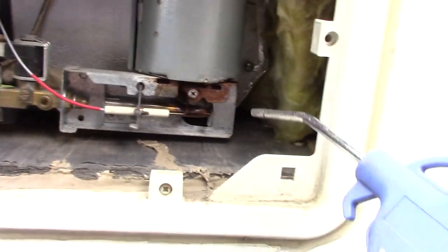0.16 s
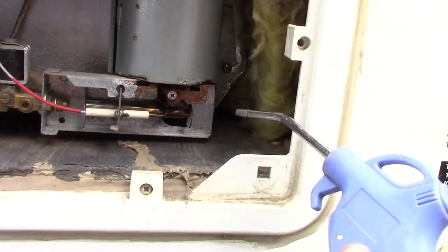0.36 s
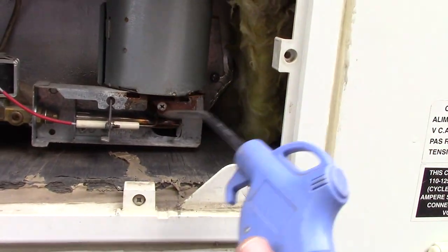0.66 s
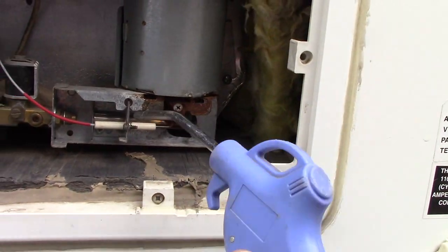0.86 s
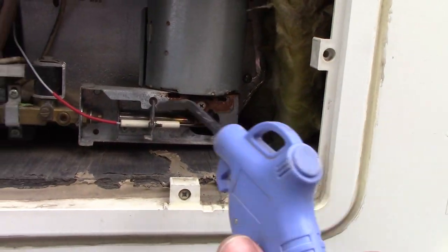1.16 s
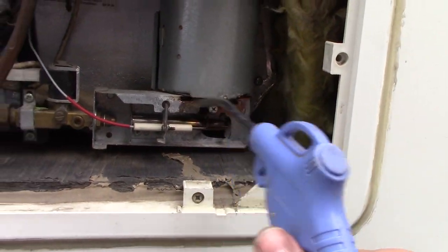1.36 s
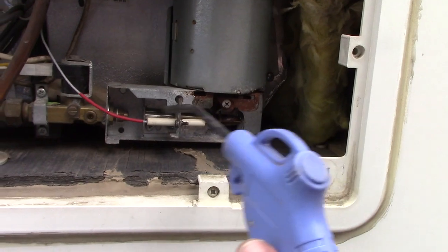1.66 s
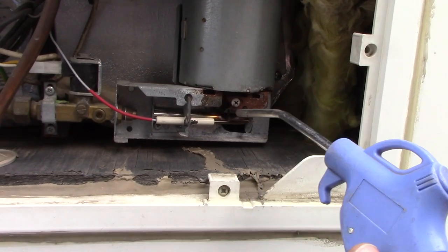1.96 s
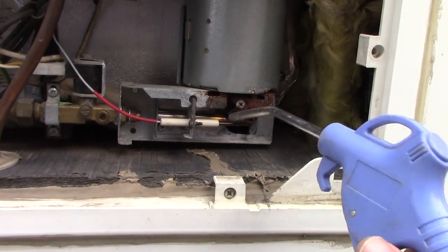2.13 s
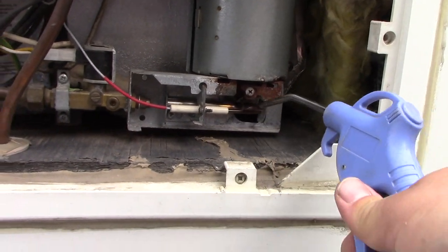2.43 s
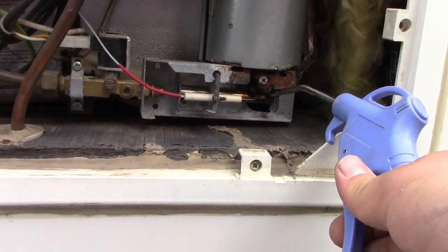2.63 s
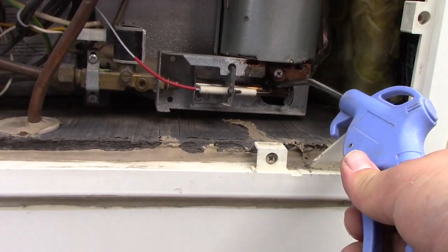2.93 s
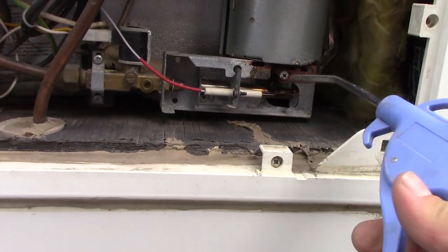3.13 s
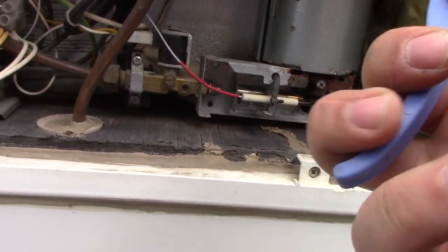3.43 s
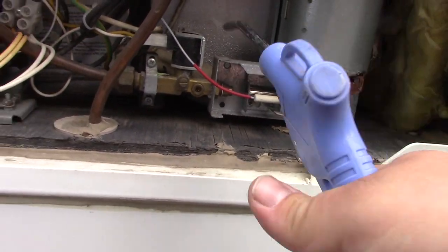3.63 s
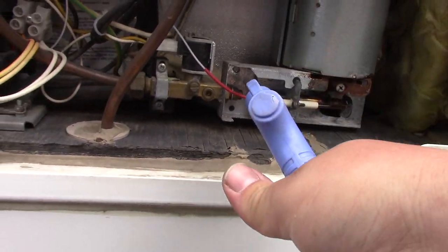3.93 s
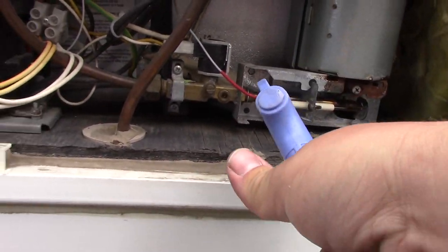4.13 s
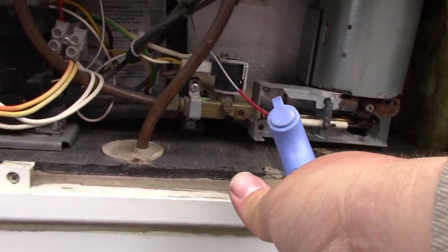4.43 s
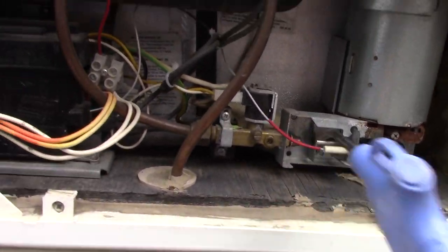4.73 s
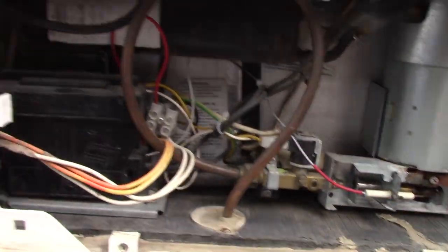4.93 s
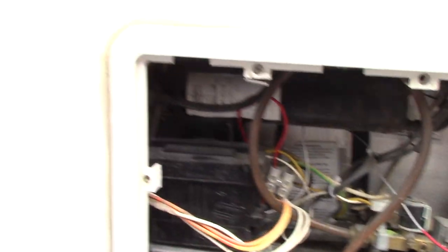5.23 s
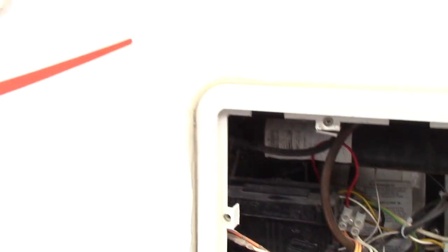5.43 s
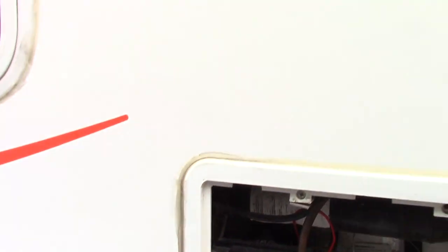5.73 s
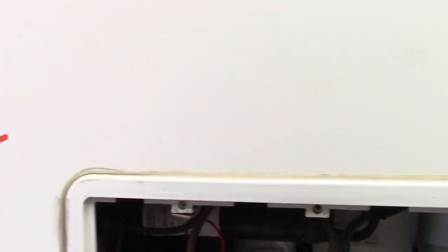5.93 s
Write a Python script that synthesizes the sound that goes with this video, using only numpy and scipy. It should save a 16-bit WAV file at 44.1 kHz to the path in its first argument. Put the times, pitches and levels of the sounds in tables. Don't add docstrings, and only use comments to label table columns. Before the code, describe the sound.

Close compressed-air jet roars and hisses over steel for two seconds, then a slot burst, a whistling tube blast and quick puffs over faint traffic.

```python
import sys
import numpy as np
from scipy import signal
from scipy.fft import rfft, irfft, next_fast_len
from scipy.io import wavfile
from scipy.ndimage import uniform_filter1d, map_coordinates

SR = 44100
rng = np.random.default_rng(int(sys.argv[2]) if len(sys.argv) > 2 else 0)


def gain_from_decibels(decibels):
    exponent = np.asarray(decibels, float) / 20
    return 10 ** exponent


def store_wav(level_fs):
    pcm = np.round(np.clip(np.atleast_2d(level_fs), -1, 1) * 32767)
    wavfile.write(sys.argv[1], SR, pcm.T.astype(np.int16))


N = 268569
HZ = np.fft.rfftfreq(N, 1 / SR) + 1
T = np.arange(N) / SR

# low edge in Hz, high edge in Hz.
LAYER_BANDS_HZ = (6000, 12000), (1500, 6000), (0, 1500), (12000, 22050)
# frequency in Hz, level in dB per Hz.
ON_BRACKET = [(18, -74), (30, -43.5), (93, -36.5), (271, -11), (423, -7.5), (733, -4), (1170, -6),
              (2400, 1), (3300, 2), (4400, 0), (5650, -2), (6280, -1), (7160, 4), (10300, 2.5),
              (12700, -9.5), (14500, -15), (15700, -14.5)]
IN_SLOT = [(18, -76.5), (30, -51), (371, -18.5), (469, -13.5), (535, -16), (977, -9.5), (1060, -8.5),
           (1300, -8.5), (1450, -8), (4350, 1.5), (5960, -4), (10600, -3.5), (15700, -16)]
IN_TUBE = [(18, -67), (30, -36), (183, -43), (293, -28.5), (508, -35), (610, -17.5), (677, -25.5),
           (1090, -21), (1880, -3.5), (2940, -0.5), (6110, -7), (7740, 0), (10100, -3.5), (13100, -7),
           (15700, -8.5)]
FREE_AIR = [(18, -66), (30, -37.5), (193, -31), (952, -14.5), (1060, -16), (1490, -13), (4580, -5.5),
            (7740, 6), (9800, 2), (11800, -2), (15700, -11)]
AIM_ENDS_S = 2.5, 3.5, 4.88, 5.18, 5.34, 5.5
# frequency in Hz, width in Hz, lift in dB.
TUBE_MODES = [(595, 53, 3), (1990, 240, 2), (2960, 380, 3.5), (3740, 130, 6.5), (4640, 490, 3.5),
              (7680, 620, 3.5), (10030, 450, 7), (11900, 400, 3.5)]
# frequency in Hz, width in Hz, lift in dB.
FRAME_MODES = [(2730, 1530, 4.5), (6280, 1400, 1), (7760, 500, 2), (10200, 200, 0), (12280, 1100, 3),
               (13300, 700, 1.5)]
# frequency in Hz, width in Hz, lift in dB.
MIC_NOTCH = [(12800, 900, -4)]
# lag in ms, drift with the hand in ms, level in dB.
WALLS = [
    (.55, 0.094, -13.5),
    (1.901, .2, -23.5),
    (5.501, .4, -23.5),
]

# time in seconds, hiss in dB, contact with metal in dB.
FLOW_LONG = [(0, -14.5, -1.5), (.07, -19, 0.1), (.16, -19.5, -1.5), (.45, -19.5, -1), (.6, -20.5, 4.5),
             (1.0, -20, -0.1), (1.5, -20.5, 2), (1.995, -22.5, 3), (2.035, -28.5, -0.5)]
FLOW_MIDDLE = [
    [(2.74, -23, -4), (2.76, -16, -0.5), (2.815, -15, 1.5), (2.87, -16.5, 1.3), (2.908, -21, 2),
     (2.998, -21, 1.5), (3.038, -29, -3.5)],
    [(4.06, -28, -1.5), (4.075, -21.5, -3.5), (4.152, -21.5, 3), (4.172, -14.5, 0), (4.19, -11.5, 2),
     (4.296, -19, 3.5), (4.624, -21, 3.5), (4.682, -21, -6.5)],
]
FLOW_PUFFS = [
    [(4.96, -18.5, 2), (4.974, -13.5, -1), (5.02, -13.5, -5), (5.054, -15.5, -5), (5.108, -28, 7)],
    [(5.2, -17.5, -12), (5.225, -18, 1), (5.27, -19.5, 4), (5.3, -23.5, 1)],
    [(5.373, -18.5, -0.5), (5.42, -18.5, 1.4), (5.447, -18.5, -0.3), (5.466, -21.5, -0.5)],
    [(5.528, -20, -2.5), (5.55, -20, 6), (5.58, -22, -3), (5.606, -21.5, -3.5), (5.626, -26, -8.5)],
]
# time in seconds, hiss in dB.
SEEP = [(5.3, -47), (5.36, -37.5), (5.5, -43.5), (5.64, -37.5), (5.67, -34.5), (5.72, -44), (5.77, -45.5),
        (5.83, -46.5), (5.88, -56.5), (5.95, -67), (6.09, -76)]
# fully open in seconds, rise in dB per second.
OPENS = [
    (0, 2000),
    (2.738, 1601),
    (4.056, 3500),
    (4.958, 3000),
    (5.197, 3500),
    (5.37, 2199),
    (5.526, 1600),
]
# start in seconds, fall in dB per second, echo left in the yard in dB.
SHUTS = [
    (2.037, 2202, -53.5),
    (3.04, 1800, -54.5),
    (4.682, 2187, -46),
    (5.111, 1506, -43),
    (5.301, 1500, -39),
    (5.467, 1000, -36),
    (5.628, 1400, -50),
]
# fully open in seconds, leak in dB, rise in dB per second.
LEAKS = [
    (2.736, -38.5, 1000),
    (4.054, -41.5, 699),
    (4.957, -21, 1500.5),
    (5.197, -41, 1499),
]
# time in seconds, length in seconds, change in dB.
SWEEPS = [(.56, 0.025, -0.5), (.67, 0.011, -2.5), (1.03, 0.013, -0.5), (1.15, 0.0068, -1),
          (1.29, 0.054, -3), (1.346, 0.0099, 3), (1.42, 0.046, -3), (1.48, .03, 1), (1.9, 0.02, 0),
          (1.95, 0.029, 2)]
# time in seconds, length
# in seconds, change in dB.
SLIPS = [(1.216, .006, -18), (1.282, 0.0051, -5), (1.508, 0.0073, -15), (1.804, 0.009, -8.5),
         (1.894, 0.009, -8), (1.96, .07, -4), (2.024, .022, -13), (2.898, .008, 11)]
# splash, roar and edge, all in dB against the hiss.
LAYERS_DB = [
    (-3, -11, -6),
    (-1.5, -19, -4.5),
    (-2.1, -22.5, -8),
    (-4.5, -23.5, -2),
    (-6, -20, -0.5),
    (-4.5, -22, -2),
    (-5.5, -22.5, 0.5),
]
CONTACT_SHARE = .3, 0.79, .1
# time in seconds, length in seconds, frequency in Hz, lift in dB.
GLINTS = [(0.093, 0.054, 11200.0, 4.1), (0.146, 0.054, 8440.0, -4.0), (0.363, 0.082, 14500, 3.8),
          (0.438, 0.139, 12500, -1), (0.48, 0.049, 8700.0, 2.5), (0.7, 0.015, 7640, 4.5),
          (0.723, 0.045, 13950.0, 6), (0.882, 0.023, 5250.0, -3.4), (1, 0.028, 4420, 5.5),
          (1.207, 0.093, 11020.0, -3), (1.353, 0.035, 14730.0, -3.5), (1.373, 0.028, 12500, 6.5),
          (1.395, 0.041, 8530.0, -6), (1.75, 0.038, 12750.0, 5.5), (1.872, 0.054, 12920.0, 4),
          (1.884, 0.035, 4480.0, -5), (1.892, 0.035, 11000, 4.5), (1.895, 0.041, 2840.0, -4.5),
          (1.95, 0.036, 8350.0, 3.5), (1.974, 0.03, 12400.0, 0.5), (1.974, 0.03, 14990.0, -6.5),
          (2.763, 0.014, 14990.0, -3.5), (2.766, 0.017, 10500, 3), (2.769, 0.023, 12750.0, -3.5),
          (4.097, 0.056, 2380, -5.0), (4.14, 0.021, 12660.0, 1), (4.15, 0.14, 9600, -5.5),
          (4.65, 0.017, 2240.0, -1), (5.0, 0.027, 7750, 1.5), (5.085, 0.019, 14990.0, 5),
          (5.088, 0.023, 9400, 7), (5.09, 0.014, 4650.0, -11.5), (5.1, 0.012, 13090.0, 1),
          (5.216, 0.011, 1810.0, -0.5), (5.219, 0.014, 10250.0, 4), (5.379, 0.014, 5600.0, -8),
          (5.384, 0.012, 10770.0, 6), (5.393, 0.017, 15040, 5.9), (5.426, 0.033, 7000.0, 0.5),
          (5.448, 0.014, 14990.0, -6.2), (5.545, 0.036, 6000, 5.5), (5.547, 0.016, 12060.0, -10),
          (5.587, 0.021, 12060.0, 4), (5.613, 0.012, 9700, 5), (5.806, 0.045, 7200.0, 3.5)]

# start in seconds, traffic then in dB, climb in dB per second.
RECOVERY = [
    (2.041, -84, 20.5),
    (3.04, -73.5, 16.5),
    (4.691, -71.5, 41),
    (5.11, -53, 8),
    (5.309, -50, 1),
    (5.47, -59, 1),
    (5.64, -54, 39),
]
# frequency in Hz, level in dB per Hz.
TRAFFIC = [(30, -34.5), (120, -21), (300, -13), (600, -2.5), (900, 0.5), (1400, -3.5), (2600, -9),
           (4000, -12.5), (8000, -36), (15700, -46)]
# frequency in Hz, level in dB per Hz.
RUSTLE = [(1500, -22), (3500, -7.5), (4500, 3), (5100, 4), (6000, 0.5), (7000, -1), (10000, -8),
          (13000, -11.5), (15700, -24.5)]
# low edge in Hz, high edge in Hz.
RUSTLE_BANDS_HZ = (3500, 7500), (7500, 14000)
# start in seconds, length in seconds, sleeve and fingers in dB against traffic.
RUBS = [(2.18, .1, 4, -8.5), (2.3, .15, -14, -13), (3.1, 0.24, -7, -10), (3.385, 0.04, -13, -12),
        (3.43, 0.069, -22, -7.5), (3.675, 0.04, -19.5, -9.5), (3.718, 0.056, -11, -4), (3.5, .03, -20, -12),
        (3.81, 0.09, -6, -16.5), (3.92, .15, -15, -23.5), (4.69, .05, 19, 10), (2.645, 0.035, -6, -4.5),
        (2.7, .02, -4, 1.5), (4.778, 0.14, -5, -21), (4.915, .02, 4, -4), (5.85, 0.25, -25, -30)]

# start in seconds, frequency in Hz, level in dB, t60 in seconds.
TUBE_RING = [
    (2.045, 596, -71, .2),
    (2.045, 1210, -71.5, 0.16),
    (4.685, 613, -55, 0.26),
    (4.685, 3880, -60, 0.7),
]
# start in seconds, frequency in
# Hz, level in dB, t60 in seconds.
CREAKS = [(2.36, 8500, -84.5, .2), (3.84, 4800, -69, .15), (3.862, 3480, -68, 0.22), (3.94, 4800, -67, .15),
          (3.955, 5680, -69.5, .2), (3.985, 5000, -70.5, .25), (3.945, 6740, -73, .2),
          (4.9115, 7000, -44, 0.027)]
# frequency in Hz, level in dB, t60 in seconds.
LEVER_MODES = [(1604, 0, 0.057), (2016, -12, 0.21), (2864, -7, 0.13), (3750, 6.5, 0.057),
               (4113, -6.5, 0.041), (4850, -6.5, 0.12), (6137, -12, 0.04), (6960, -4, 0.062),
               (7075, -19, 0.047), (8936, -18.5, 0.05)]
# start in seconds, peak in dB, centre in Hz, t60 in seconds.
TICKS = [(2.6272, -36, 3740, 0.03), (2.6678, -45, 6600, 0.01), (3.3927, -55, 8500, 0.02),
         (3.6626, -50, 2480, 0.025), (3.746, -60, 12500, .012), (3.7788, -47, 10500, 0.015),
         (3.7923, -40, 2396, 0.025), (3.796, -54, 9000, .02), (3.8294, -56, 7790, 0.015),
         (3.8864, -59, 11000, 0.012), (3.914, -43, 2450, 0.025), (3.917, -56, 9000, .02),
         (4.9112, -40, 7000, 0.02), (3.7209, -58, 6400, .03), (3.803, -56, 6000, .012)]
# start in seconds, peak in dB, centre in Hz, t60 in seconds.
KNOCKS = [
    (2.89, -14, 2490, 0.032),
    (2.895, -16.5, 1500, 0.028),
    (5.171, -30, 1200, 0.045),
]
# start in seconds, peak in dB, centre in Hz, t60 in seconds.
POPS = [
    (4.0542, -23.5, 2960, 0.046),
    (5.1942, -22.5, 3670, 0.038),
    (5.3673, -16, 3100, 0.022),
    (5.5229, -22.5, 2960, 0.033),
]
# time in seconds, pitch in Hz, level in dB.
WHISTLES = [
    [(4.172, 1824, -23.5), (4.184, 1961, -9.5), (4.218, 2275, -13), (4.236, 2054, -27)],
    [(4.17, 3624, -10.5), (4.18, 3740, -23.5), (4.19, 3724, -23.5)],
    [(4.635, 3890, -40), (4.645, 4034, -18), (4.655, 3755, -17), (4.665, 3800, -39)],
    [(6.03, 5470, -84), (6.046, 5528, -50), (6.062, 5460, -52), (6.085, 5520, -58.5)],
]
# time in seconds, pitch in Hz.
GAP_HZ = [(4.96, 7740), (5.05, 7390), (5.1, 6415), (5.2, 7300), (5.3, 7900), (5.37, 5650), (5.47, 6710),
          (5.53, 6400), (5.63, 5640), (5.8, 7100)]

# frequency in Hz, side against mid in dB.
PORTS_APART = [(30, -5), (100, -16), (400, -30), (3000, -19), (7000, -17), (9500, -17), (11000, -9.5),
               (12500, -5.5), (14000, -7), (14800, -17), (15700, -22)]
# frequency in Hz, side against mid in dB.
DIFFUSE_APART = [(30, -8), (110, -12.5), (380, -33), (700, -49), (2380, -42.5), (4400, -25.5), (8120, -8.5),
                 (15000, -4.5)]
OFF_CENTRE_DB = -4.5, -7.5, -7, -3, -5.5, -1, -3.5

ECHO_LAYERS_DB, SEEP_LAYERS_DB = (1.3, -21.5, -3.5), (-0.5, -19, 1)
ECHO_FAST_DB_S, ECHO_SLOW_DB_S, ECHO_SLOW_DB = 420, 90, -10.5
ECHO_TREBLE_DB_S, SEEP_TREBLE_DB_S = 40, 75
SLIP_BODY_SHARE, BODY_HZ = .6, (1300, 2800)
GLINT_WIDTH_HZ = 800
TRAFFIC_FULL_DB = -46
RUSTLE_REST_DB, RUB_EDGE_S = (-16, -24.5), 0.017
LEVER_S, LEVER_DB = 2.626, -48.5
GAP_DB, GAP_WIDTH_HZ = -7, 900
STEADY_SHARE = .5
IN_PHASE_DB = -7
TOP_HZ = 15760
CEILING, LATE_LIMIT = .9, (5.005, .016, 5)
LIMITER_FLOOR_HZ = 500


def shape(points):
    hz, db = np.transpose(points)
    return gain_from_decibels(np.interp(np.log(HZ), np.log(hz), db))


def modes(table):
    return gain_from_decibels(sum(db / (1 + (2 * (HZ - hz) / width) ** 2) for hz, width, db in table))


def band(lo_hz, hi_hz):
    below_top = 1 / (1 + (HZ / hi_hz) ** 16)
    below_bottom = 1 / (1 + (HZ / (lo_hz + 1e-3)) ** 16)
    return np.sqrt(np.abs(below_top - below_bottom))


def through(x, gain):
    size = next_fast_len(N + 8192)
    padded_hz = np.fft.rfftfreq(size, 1 / SR) + 1
    return irfft(rfft(x, size) * np.interp(padded_hz, HZ, gain), size)[..., :N]


def noise(gain, lo_hz, hi_hz):
    spectrum = gain * rng.standard_normal(2 * len(HZ)).view(complex)
    inside = (HZ > lo_hz) & (HZ < hi_hz)
    return irfft(spectrum, N) * N / np.sqrt(2 * np.sum(np.abs(spectrum[inside]) ** 2))


def walk(rate):
    hold = int(SR / rate)
    steps = np.repeat(rng.standard_normal(N // hold + 1), hold)[:N]
    return 1.3 * uniform_filter1d(uniform_filter1d(steps, hold), hold)


def bumps(table):
    return sum(db * np.exp(-((T - s) / length) ** 2) for s, length, db in table)


def ring(hz, t60):
    t = T[:SR // 4]
    return np.sin(2 * np.pi * hz * t) * gain_from_decibels(-60 * t / t60)


def add(out, s, x):
    i = int(s * SR)
    out[i:i + len(x)] += x[:N - i]


def latest(starts):
    return np.maximum(np.searchsorted(starts, T) - 1, 0)


def airflow(aim):
    s, flow_db, contact_db = np.concatenate([FLOW_LONG, *FLOW_MIDDLE, *FLOW_PUFFS]).T
    valve = 0
    for (opens, rise), (shuts, fall, _) in zip(OPENS, SHUTS):
        valve = valve + gain_from_decibels(np.minimum(rise * (T - opens), 0) - fall * np.maximum(T - shuts, 0))
    blast = valve * gain_from_decibels(np.interp(T, s, flow_db) + bumps(SWEEPS))
    leak = sum((T < opens) * gain_from_decibels(leak_db + rise * (T - opens)) for opens, leak_db, rise in LEAKS)
    blast = np.hypot(blast, leak)

    layers_db = np.transpose(LAYERS_DB)[:, aim] + np.outer(CONTACT_SHARE, np.interp(T, s, contact_db))
    layers_db[1] = layers_db[1] + bumps(SLIPS)

    s, seep_db = np.transpose(SEEP)
    seep = (T > s[0]) * gain_from_decibels(np.interp(T, s, seep_db, right=-120))

    shuts, _, echo_db = np.transpose(SHUTS)
    last = latest(shuts)
    since = np.maximum(T - shuts[last], 0)
    decay = np.hypot(gain_from_decibels(-ECHO_FAST_DB_S * since), gain_from_decibels(ECHO_SLOW_DB - ECHO_SLOW_DB_S * since))
    echo = (since > 0) * gain_from_decibels(echo_db[last]) * decay

    gains = [np.sqrt(blast ** 2 + seep ** 2 + echo ** 2)]
    for k in range(3):
        layer_blast = blast * gain_from_decibels(layers_db[k])
        layer_seep = seep * gain_from_decibels(SEEP_LAYERS_DB[k])
        layer_echo = echo * gain_from_decibels(ECHO_LAYERS_DB[k])
        if k == 2:
            layer_seep = layer_seep * gain_from_decibels(-SEEP_TREBLE_DB_S * since)
            layer_echo = layer_echo * gain_from_decibels(-ECHO_TREBLE_DB_S * since)
        gains.append(np.sqrt(layer_blast ** 2 + layer_seep ** 2 + layer_echo ** 2))
    return gains


def jet():
    colours = [shape(ON_BRACKET), shape(IN_SLOT), shape(IN_TUBE) * modes(TUBE_MODES),
               shape(FREE_AIR) * modes(FRAME_MODES)]
    aim = np.searchsorted(AIM_ENDS_S, T)
    target = np.minimum(aim, len(colours) - 1)
    eddies_db = 0.51 * walk(40) + 0.88 * walk(300)
    gains = airflow(aim)
    out = gains[0] * gain_from_decibels(GAP_DB + eddies_db) * singing_gap()
    for (lo, hi), gain in zip(LAYER_BANDS_HZ, gains):
        at_port = modes(MIC_NOTCH) * band(lo, hi)
        layer = np.choose(target, [noise(colour * at_port, lo, hi) for colour in colours])
        out = out + layer * gain * gain_from_decibels(eddies_db + 0.6 * walk(25))
    out = glinting(out)
    body = through(out, band(*BODY_HZ) ** 2)
    out = out + (gain_from_decibels(SLIP_BODY_SHARE * bumps(SLIPS)) - 1) * body
    return off_walls(out)


def off_walls(direct):
    total, power = direct, 1
    for lag_ms, drift_ms, db in WALLS:
        arrival = T - 1e-3 * (lag_ms + drift_ms * walk(4))
        total = total + map_coordinates(direct, [arrival * SR], order=3) * gain_from_decibels(db)
        power = power + gain_from_decibels(2 * db)
    return total / np.sqrt(power)


def glinting(x):
    hz, s, cells = signal.stft(x, SR, nperseg=256)
    db = 0
    for at, length, centre_hz, lift_db in GLINTS:
        across_hz = np.exp(-((hz - centre_hz) / GLINT_WIDTH_HZ) ** 2)
        across_time = np.exp(-((s - at) / length) ** 2)
        db = db + lift_db * np.outer(across_hz, across_time)
    return signal.istft(cells * gain_from_decibels(db), SR, nperseg=256)[1][:N]


def surroundings():
    s, start_db, climb = np.transpose(RECOVERY)
    last = latest(s)
    climbing_db = start_db[last] + climb[last] * np.maximum(T - s[last], 0)
    traffic_db = np.minimum(climbing_db, TRAFFIC_FULL_DB)
    out = noise(shape(TRAFFIC), 400, 2000) * gain_from_decibels(traffic_db + 1.1 * walk(12))
    grain_db = 1.9 * walk(55) + 1.1 * walk(600)
    for k, (lo, hi) in enumerate(RUSTLE_BANDS_HZ):
        moving = gain_from_decibels(RUSTLE_REST_DB[k])
        for start, length, *levels_db in RUBS:
            onset = np.clip((T - start) / RUB_EDGE_S, 0, 1)
            moving = moving + gain_from_decibels(levels_db[k]) * onset * np.exp(-((T - start) / length) ** 2)
        rubbing = noise(shape(RUSTLE) * band(lo, hi), lo, hi)
        out = out + rubbing * moving * gain_from_decibels(traffic_db + grain_db)
    return out


def tube_rings_and_creaks():
    out = np.zeros(N)
    for s, hz, db, t60 in list(TUBE_RING) + list(CREAKS):
        add(out, s, gain_from_decibels(db) * ring(hz, t60))
    return out


def lever_rattle():
    out = np.zeros(N)
    t = T[:SR // 4]
    body = sum(gain_from_decibels(db) * ring(hz, t60 / 10) for hz, db, t60 in LEVER_MODES)
    rattle = rng.standard_normal(SR // 4) * (gain_from_decibels(-60 * t / .05) + .2 * gain_from_decibels(-60 * t / .35))
    lever = gain_from_decibels(-16) * signal.fftconvolve(body, rattle)[:SR // 4] + gain_from_decibels(-3) * rattle
    lever = signal.lfilter(*signal.butter(3, [1200, 11000], "bandpass", fs=SR), lever)
    add(out, LEVER_S, gain_from_decibels(LEVER_DB) * lever)
    return out


def ticks():
    out = np.zeros(N)
    for s, db, hz, t60 in list(TICKS) + list(KNOCKS) + list(POPS):
        edges_hz = [hz / 1.8, min(1.5 * hz, .45 * SR)]
        crack = rng.standard_normal(SR // 4)
        crack = signal.lfilter(*signal.butter(2, edges_hz, "bandpass", fs=SR), crack)
        crack = crack * gain_from_decibels(-60 * T[:SR // 4] / t60)
        add(out, s, gain_from_decibels(db) * (.2 * ring(hz, t60 / 2) + .9 * crack))
    return out


def whistles():
    out = 0
    for table in WHISTLES:
        s, hz, db = np.transpose(table)
        pitch = np.interp(T, s, hz) * (1 + .018 * walk(300))
        sounding = uniform_filter1d(1. * ((T > s[0]) & (T < s[-1])), size=200)
        strength = np.sqrt(2) * gain_from_decibels(np.interp(T, s, db) + 0.73 * walk(200))
        out = out + sounding * strength * np.sin(2 * np.pi * np.cumsum(pitch) / SR)
    return out


def singing_gap():
    s, hz = np.transpose(GAP_HZ)
    flutter = noise(1 / (1 + (2 * HZ / GAP_WIDTH_HZ) ** 4), 0, SR)
    carrier = np.sin(2 * np.pi * np.cumsum(np.interp(T, s, hz)) / SR)
    return (T > AIM_ENDS_S[2]) * np.sqrt(2) * flutter * carrier


def scene():
    near = jet() + tube_rings_and_creaks() + lever_rattle() + ticks() + whistles()
    far = surroundings()
    wander = np.sqrt(2) * np.cos(np.cumsum(2 * np.pi * 130 / SR * (1 + .3 * walk(30))))
    lean = gain_from_decibels(np.choose(np.searchsorted(AIM_ENDS_S, T), OFF_CENTRE_DB) + 2.2 * walk(25))
    valve_open = sum(1. * ((T > a) & (T < b)) for (a, _), (b, *_) in zip(OPENS, SHUTS))
    blowing = uniform_filter1d(valve_open, size=600)
    lagged = through(lean * blowing * near, (1j - gain_from_decibels(IN_PHASE_DB)) * shape(PORTS_APART))
    side = (np.sqrt(STEADY_SHARE) + np.sqrt(1 - STEADY_SHARE) * wander) * lagged
    side = side + wander * through(far + (1 - blowing) * near, shape(DIFFUSE_APART))
    return np.array([near + far + side, near + far - side])


def roll_off(x):
    return signal.sosfilt(signal.butter(12, 16300, fs=SR, output="sos"), x)


def record(dry):
    ceiling = CEILING * gain_from_decibels(bumps([LATE_LIMIT]))
    shaved = dry / (1 + np.abs(dry / ceiling) ** 4) ** .25 - dry
    top_cut = gain_from_decibels(-60 * np.clip((HZ - TOP_HZ) / 150 + .5, 0, 1) ** 2)
    limited = through(dry + through(shaved, band(LIMITER_FLOOR_HZ, SR)), top_cut)
    return roll_off(limited)


dry = scene()
out = record(dry)
store_wav(out)
```